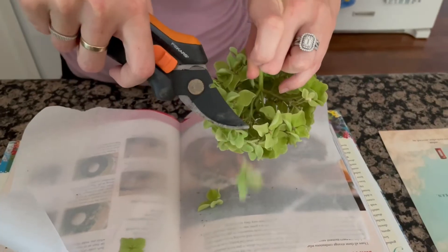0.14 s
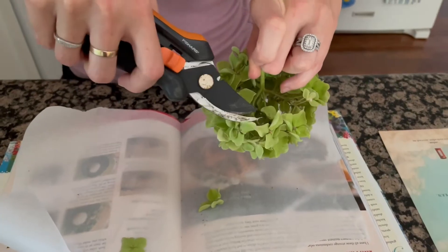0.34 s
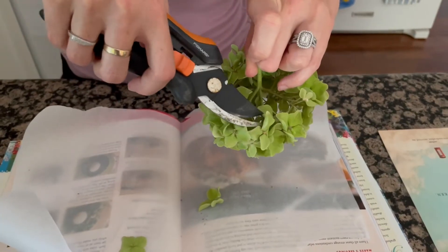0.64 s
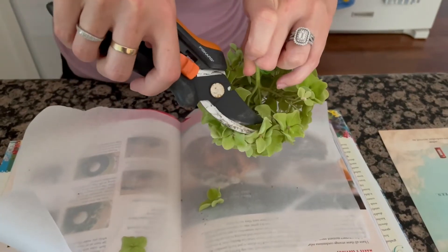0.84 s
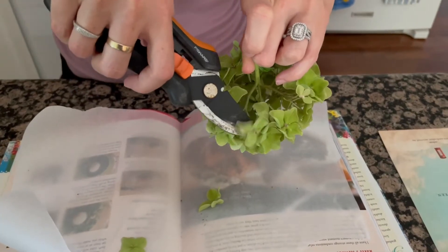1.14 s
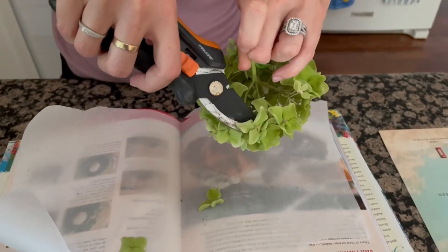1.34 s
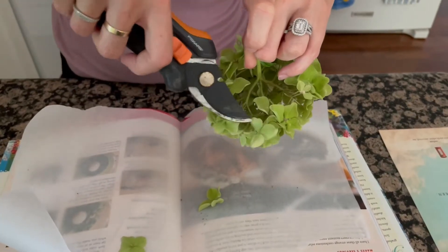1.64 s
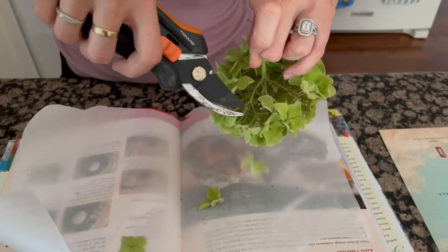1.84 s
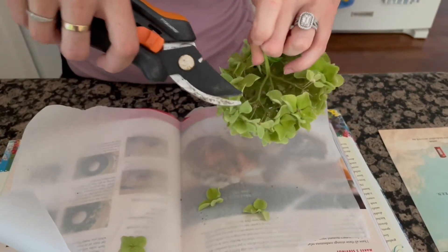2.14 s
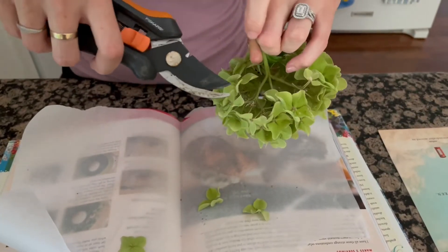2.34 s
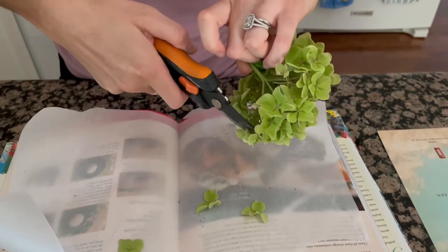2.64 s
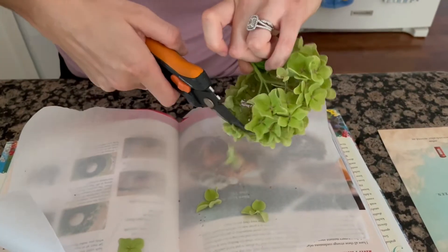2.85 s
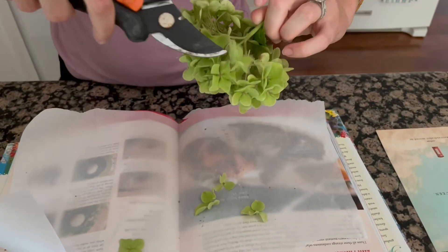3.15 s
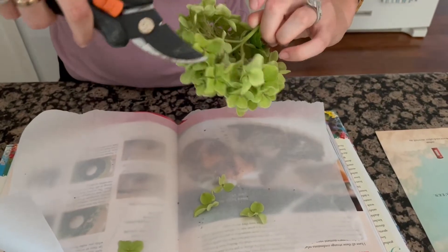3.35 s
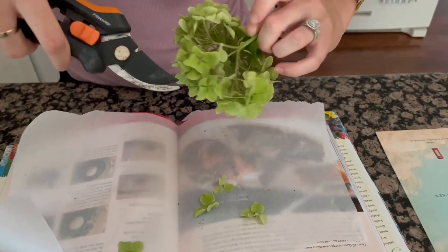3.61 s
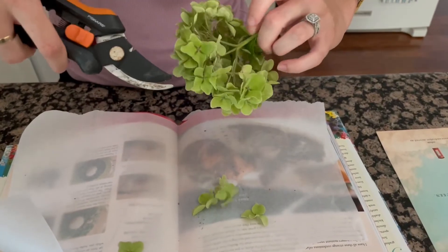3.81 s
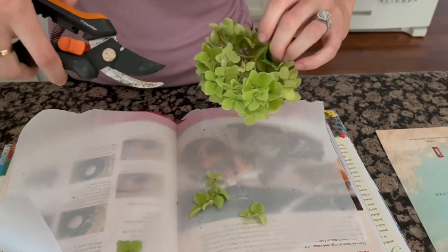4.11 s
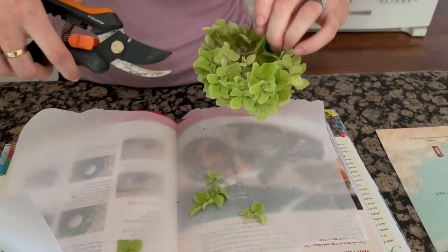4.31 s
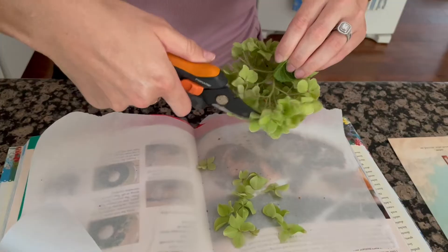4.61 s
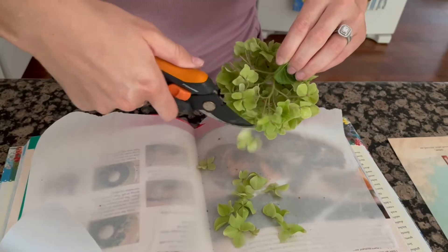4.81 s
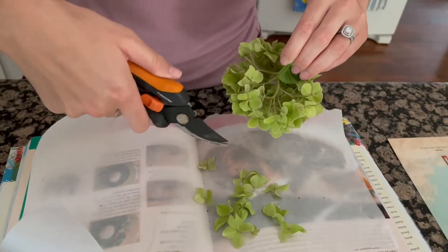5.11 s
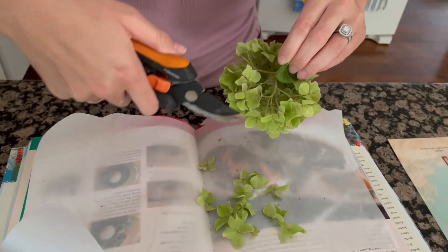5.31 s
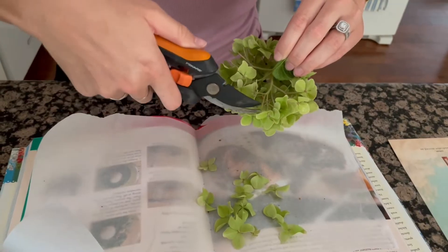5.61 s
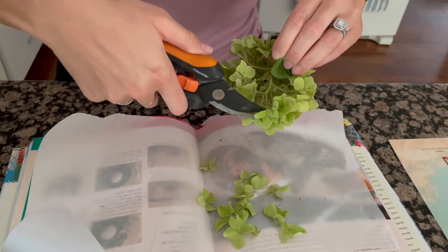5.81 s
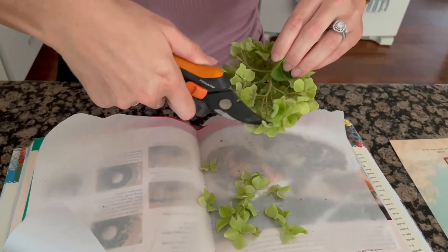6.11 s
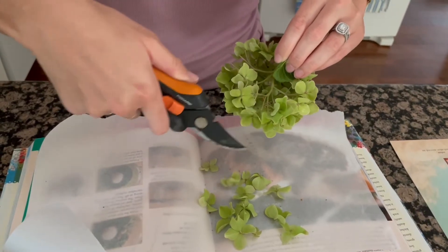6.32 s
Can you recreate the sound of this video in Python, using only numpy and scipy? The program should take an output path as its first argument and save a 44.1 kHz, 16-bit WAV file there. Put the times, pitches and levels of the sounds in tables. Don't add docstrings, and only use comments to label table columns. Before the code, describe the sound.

Over a quiet ventilation hum, blades snap sharply through a stem, then snip again in uneven groups with petals rustling and stems creaking. The middle grows busier with clicks, folds and a brief dull cloth drag. An abrupt scene change brings a much stronger low airy rumble, with more crisp cuts on top. Near stereo phone microphone, small kitchen with short reverberation.

```python
import sys
import numpy as np
from scipy import signal
from scipy.fft import rfft, irfft
from scipy.io import wavfile
from scipy.ndimage import uniform_filter1d

SR = 44100
rng = np.random.default_rng(int(sys.argv[2]) if len(sys.argv) > 2 else 0)


def int16_out(signal):
    q = np.round(np.clip(np.atleast_2d(signal).T, -1, 1) * 32767)
    wavfile.write(sys.argv[1], SR, q.astype(np.int16))


def boost_factor(decibels):
    exponent = np.asarray(decibels, float) / 20
    return 10 ** exponent


N = 284886
HZ = np.fft.rfftfreq(N, 1 / SR)
SIDES = np.array([[1], [-1]])
BROAD, FOCUS = 5, 0.8


def on_log(table, hz):
    f, v = np.transpose(table)
    return np.interp(np.log(hz + 1), np.log(f + 1), v)


def unit(x):
    return x / np.sqrt(np.mean(x ** 2))


def colour(x, db):
    return irfft(rfft(x) * boost_factor(db), x.shape[-1])


def bump(hz, centre_hz, width_hz):
    return 1 / (1 + (2 * (hz - centre_hz) / width_hz) ** 2)


def walk(rate):
    k = int(SR / rate)
    levels = np.repeat(rng.standard_normal(N // k + 1), k)
    return 1.3 * uniform_filter1d(uniform_filter1d(levels, k), k)[:N]


def diffuse(length):
    # pitch_hz, coherence (0-1)
    alike = [(60, .96), (200, .92), (400, .75), (800, .4), (1500, .1), (3000, .3), (4200, .7), (5200, .25),
             (6300, .75), (7000, .85), (7700, .9993), (17000, .9993)]
    c = np.clip(on_log(alike, np.fft.rfftfreq(length, 1 / SR)), 0, 1)
    mid, side = rfft(rng.standard_normal((2, length)))
    return irfft(np.sqrt((1 + c) / 2) * mid + np.sqrt((1 - c) / 2) * side * SIDES, length)


def swells(s, hold_s, db, t60, rise_db_s):
    t = np.arange(0, N + 32, 32)[:, None] / SR
    rise_lost_db = rise_db_s * np.maximum(s - t, 0)
    fade_lost_db = 60 / np.maximum(t60, 0.02) * np.maximum(t - s - hold_s, 0)
    gains = np.atleast_2d(boost_factor(db - np.minimum(rise_lost_db + fade_lost_db, 200)))
    gain = np.sqrt(np.sum(gains ** 2, axis=1))
    return np.interp(np.arange(N) / SR, t[:, 0], gain)


def crackle(rate, spread_db, hiss):
    sizes_db = spread_db * np.minimum(rng.exponential(size=N), 4)
    slips = (rng.random(N) < rate / SR) * boost_factor(sizes_db)
    smear = np.exp(-np.arange(300) / (0.0012 * SR))
    rub = hiss + unit(signal.fftconvolve(slips, smear)[:N])
    return rub * boost_factor(1.5 * walk(45)) * diffuse(N)


def patchy(x, centres_hz, patch_db):
    spectrum = rfft(x)
    total = 0
    for f in centres_hz:
        band = irfft(spectrum * bump(HZ, f, 0.2 * f) ** 2, N)
        total = total + boost_factor(patch_db * walk(22) + 2.2 * walk(150)) * band
    return unit(total)


def drone(spectrum, duct, level, deep_db):
    # middle_s, depth_db, half_length_s
    sags = [(.12, 13, 0.14), (.45, 2.5, 0.39), (0.777, 6, 0.45), (1.29, 21.5, 0.15), (1.8, 15, 0.15),
            (2.218, 10.5, 0.19), (2.577, 12, 0.32), (3.024, 9.5, 0.13), (3.315, 5, 0.11), (3.798, 25, 0.15),
            (4.156, 16, 0.26), (4.417, 16, 0.08), (5.472, 5.5, 0.29), (5.75, -0.5, 0.093),
            (6.004, 8, 0.091), (6.38, 17, 0.1)]
    db = on_log(spectrum, HZ) + sum(g * bump(HZ, f, w) for f, w, g in duct)
    air = unit(colour(diffuse(N), db))
    deep = irfft(rfft(air) * bump(HZ, 57.7, 56) ** 2, N)
    power = uniform_filter1d(deep.mean(axis=0) ** 2, SR // 8)
    envelope = np.sqrt(uniform_filter1d(power, SR // 8)) + 1e-9
    t = np.arange(N) / SR
    sag_db = sum(d * np.maximum(1 - np.abs(t - s) / half, 0) for s, d, half in sags)
    rush = (air - deep) * boost_factor(0.7 * walk(5))
    return level * (rush + deep / envelope * boost_factor(deep_db - sag_db))


def ventilation(after):
    # pitch_hz, density_db (per Hz)
    soft_spectrum = [(12, -58), (20, -43.5), (40, -9), (65, 5.5), (86, -6.5), (174, -9.5), (323, -19),
                     (440, -20), (994, -26.5), (1300, -31), (3230, -39), (4660, -46.5), (8650, -45),
                     (12500, -56.5), (16500, -49.5)]
    loud_spectrum = [(12, -61), (20, -57), (49, 0), (91, -7.5), (156, -2.5), (265, -10.5), (314, -14.5),
                     (440, -17.5), (888, -24), (1140, -24.5), (2500, -36.5), (3300, -45), (6500, -56),
                     (12500, -62.5), (16500, -68.5)]
    # pitch_hz, width_hz, level_db (over the drone)
    soft_duct = [(59, 4, 13), (118, 8, 7), (165, 12, 8), (195, 8, 5), (362, 30, 6), (478, 10, 6),
                 (1050, 30, 8), (1850, 60, 4)]
    loud_duct = [(59, 4, 12), (130, 10, 4), (149, 8, 7), (175, 8, 5), (220, 5, 7), (259, 4, 8),
                 (480, 10, 4), (1050, 150, 2)]
    soft = drone(soft_spectrum, soft_duct, boost_factor(-47.5) * (1 - after), deep_db=-1.15)
    loud = drone(loud_spectrum, loud_duct, boost_factor(-37.5) * after, deep_db=-3.5)
    return soft + loud


def whine(after):
    # pitch_hz, soft_db, loud_db
    tones = [(438, -74, -65), (259, -82, -60), (1050, -84, -79)]
    t = np.arange(N) / SR
    total = 0
    for hz, soft_db, loud_db in tones:
        level_db = soft_db + (loud_db - soft_db) * after + 2.53 * walk(5.4)
        total = total + boost_factor(level_db) * np.sin(2 * np.pi * hz * t + 0.99 * walk(3))
    return total


def sleeve():
    cloth = unit(irfft(rfft(diffuse(N)) * bump(HZ, 1160, 2100) ** 2, N))
    return cloth * swells(3.438, 0, -50, 0.57, rise_db_s=371)


def petals():
    # pitch_hz, density_db (per Hz)
    petal = [(4500, -13.5), (6500, -12), (8500, -9), (11500, -10.5), (13500, -11), (15000, -4), (15900, -8),
             (16600, -30)]
    # time_s, level_db
    sheen = [(0, 2), (.5, 0.5), (.9, 3), (1.35, 4), (1.7, 0), (2.3, -1.5), (2.7, 1.5), (3.2, 1), (3.7, 0.5),
             (4.3, -3), (4.6, 0.5), (5, -6), (5.5, -4), (5.9, -3), (6.46, -2)]
    # start_s, hold_s, level_db, fade_t60_s
    slides = [(0, 0.18, -61.5, .3), (.196, .003, -48, 0.062), (0.233, 0.046, -53.5, 0.7),
              (0.464, .003, -56.5, 0.58), (0.597, 0.19, -67.5, 0.69), (0.857, 0.028, -61, 0.3),
              (.975, 0.018, -68.5, 0.37), (1.24, 0.11, -69, 0.45), (0.355, 0.026, -60, .2),
              (1.101, 0.065, -64.5, 0.84), (1.425, 0.03, -51.5, 0.47), (1.637, 0.053, -53.5, 0.31),
              (1.694, 0.1, -60.5, 0.45), (4.482, .05, -64, .3), (1.91, 0.0027, -51, 0.22),
              (1.982, 0.013, -50, 0.21), (5.624, 0.19, -66.5, 0.6), (2.56, 0.016, -52, 0.35),
              (2.668, 0.0035, -44, 0.31), (2.892, 0.0076, -51.5, 0.81), (3.019, 0.085, -49, 0.19),
              (3.2, 0.0034, -56, 0.46), (3.348, 0.013, -57.5, 0.78), (3.563, .01, -60, 0.21),
              (3.754, 0.16, -53, 0.34), (3.9, .01, -52, 1), (4.013, 0.067, -59, 0.2),
              (4.538, 0.018, -51.5, 0.74), (4.602, 0.14, -54, 0.19), (4.89, .003, -51.5, 0.58),
              (4.995, 0.2, -63, 0.16), (5.902, 0.08, -64, 0.33), (6.018, 0.16, -55, 0.17),
              (6.29, .01, -54, 0.69)]
    # start_s, papery_db, dull_db, fade_t60_s
    folds = [(.196, -55, -49, .2), (.225, -42, -45, 0.43), (.472, -57, -49, 0.2), (0.599, -54, -44.5, 0.24),
             (1.01, -68, -82, 0.53), (1.427, -57, -50, 0.29), (1.641, -66, -46, 0.28),
             (1.765, -46, -49, 0.21), (1.906, -61, -47, 0.14), (2.291, -62, -63, .6),
             (2.383, -51, -49.5, 0.2), (2.625, -53, -53, 0.83), (2.701, -34.5, -65, 0.079),
             (2.892, -40, -44.5, 0.29), (3.02, -57, -69, 0.44), (3.085, -44.5, -45, 0.25),
             (3.196, -65, -59, 0.19), (3.562, -51, -52, 0.33), (3.734, -49.5, -51, 1.4),
             (3.911, -44, -45, 0.49), (4.033, -59, -42.5, 0.3), (4.54, -48.5, -51, 0.69),
             (4.606, -51, -44.5, 0.56), (4.873, -45, -49.5, 1.4), (5, -36, -42, 0.25),
             (5.145, -42.5, -39.5, 0.22), (5.988, -53, -47, 0.76), (6.036, -36.5, -45, 0.14),
             (6.245, -48, -48, 0.38), (6.335, -43.5, -46, 0.76)]
    slips = crackle(400, 2.9, 2.0)
    bright_hz = [4400, 5300, 6400, 7560, 9300, 11000, 13000, 15000]
    bright = patchy(colour(slips, on_log(petal, HZ)), bright_hz, patch_db=3.5)
    top = irfft(rfft(bright) * bump(HZ, 13000, 5000), N)
    bright = bright + (boost_factor(np.interp(np.arange(N) / SR, *np.transpose(sheen))) - 1) * top
    papery = patchy(slips, [3210, 3700, 4250, 4700, 5900, 7340], patch_db=4.5)
    dull = patchy(crackle(350, 2.7, 2.7), [1480, 1775, 2300, 2970], patch_db=2.0)
    s, papery_db, dull_db, t60 = np.transpose(folds)
    sliding = swells(*np.transpose(slides), rise_db_s=603) * boost_factor(-1.5) * bright
    folding = swells(s, 0, papery_db - 14.0, t60, rise_db_s=531) * papery
    bending = swells(s, 0, dull_db - 10.5, t60, rise_db_s=531) * dull
    return sliding + folding + bending


def knocks():
    # start_s, level_db, pitch_hz, width_hz, t60_s
    rings = [(.188, -48.5, 960, 500, 0.2), (.197, -45, 3230, 250, .05), (.251, -50, 2460, 500, 0.15),
             (.57, -51.5, 1080, 700, 0.62), (0.592, -55, 2050, 300, 0.29), (.86, -55, 1570, 297, .06),
             (1.03, -68, 4730, 150, 0.16), (1.375, -71, 4000, 200, 0.55), (1.406, -59, 4000, 250, 0.2),
             (1.46, -57, 4440, 700, .25), (1.53, -66, 4600, 400, .15), (1.895, -53, 1000, 220, 0.16),
             (1.979, -57, 5600, 300, .06), (2.022, -64, 4700, 250, 0.12), (2.372, -59, 5300, 199, .12),
             (2.378, -48.5, 2060, 90, 0.15), (2.372, -55.5, 1077, 200, 0.069), (2.378, -55, 1475, 150, .1),
             (2.378, -59, 2750, 40, 0.24), (2.455, -63, 2000, 150, 0.11), (2.368, -48.5, 2650, 200, 0.056),
             (2.37, -57, 3900, 110, 0.21), (2.695, -49.5, 766, 200, 0.13), (2.675, -55, 2720, 400, 0.19),
             (3.06, -51.5, 1190, 600, 0.094), (3.149, -60, 366, 140, 0.6), (3.188, -55.5, 2570, 1200, 0.24),
             (3.21, -59.5, 2420, 900, 0.2), (3.2, -60.5, 4400, 600, 0.13), (3.24, -64.5, 3550, 300, 0.17),
             (3.015, -58, 4400, 500, 0.32), (3.06, -58, 4400, 500, 0.32), (.205, -52.5, 3500, 4000, 0.26),
             (.26, -57, 4000, 4020, .3), (3.432, -50, 1030, 150, 0.29), (3.455, -48.5, 660, 150, .15),
             (3.6, -61, 367, 120, 0.22), (4.025, -50, 1060, 248, 0.13), (4.027, -49, 5370, 500, 0.068),
             (4.03, -53, 3430, 300, .12), (4.591, -48, 2700, 300, 0.054), (5.629, -59.5, 2900, 1200, 0.44)]
    size = 8192
    t, hz = np.arange(size) / SR, np.fft.rfftfreq(size, 1 / SR)
    out = np.zeros((2, N + size))
    for s, db, ring_hz, width_hz, t60 in rings:
        ring = unit(irfft(rfft(diffuse(size)) * bump(hz, ring_hz, width_hz), size))
        i = int(s * SR)
        out[:, i:i + size] += ring * np.minimum(t / 0.0019, 1) * boost_factor(db - 60 * t / t60)
    return out[:, :N]


def strike(events, pan_db, spread):
    # pitch_hz, density_db (per Hz)
    crack_spectrum = [(500, -15.5), (1200, -24.5), (2500, -16), (4000, -17.5), (6300, -11), (8500, -8),
                      (12000, -13), (14800, -9), (15800, -15), (16500, -34)]
    size = 2048
    t, hz = np.arange(size) / SR, np.fft.rfftfreq(size, 1 / SR)
    out = np.zeros((2, N + size))
    for s, db, ring_hz, ring_db, t60 in events:
        noise = rng.standard_normal((3, size))
        fall = np.minimum(t / (0.064 * t60), 1) * boost_factor(-60 * t / max(t60, 0.002))
        crack_db = on_log(crack_spectrum, hz) + 10 * np.log10(bump(hz, ring_hz, spread * ring_hz))
        crack = unit(colour(noise[0], crack_db)) * fall
        ring = unit(irfft(rfft(noise[1]) * bump(hz, ring_hz, 0.228 * ring_hz), size)) * fall ** 0.73
        apart = boost_factor(-15) * unit(colour(noise[2], crack_db)) * fall * SIDES
        i = int(s * SR)
        out[:, i:i + size] += (crack + apart + boost_factor(ring_db) * ring) * boost_factor(db - 3.0 + pan_db / 2 * SIDES)
    return out[:, :N]


def stem_creaks():
    # start_s, peak_db, pitch_hz
    creaks = [(0.5125, -45.5, 1800), (.5574, -53, 2700), (1.694, -42, 3200), (2.0326, -51, 2000),
              (3.189, -49, 2330), (3.8377, -42, 1980), (4.0503, -50, 3300), (4.5097, -51, 1890),
              (4.724, -50, 1960), (4.8592, -40, 2080), (4.987, -38, 2460), (5.01, -37, 3430),
              (5.63, -48, 1960), (6.137, -53, 2000), (6.334, -39, 2480), (6.353, -42, 2850),
              (6.423, -42, 1910)]
    return strike([(s, db, hz, -7.5, 0.029) for s, db, hz in creaks], pan_db=2, spread=BROAD)


def petal_flicks():
    # start_s, peak_db, pitch_hz
    flicks = [(.337, -60, 6000), (0.37, -51, 4570), (.478, -61, 9500), (.5575, -42, 11500),
              (0.512, -46, 11500), (.805, -60.5, 11700), (1.13, -51, 7160), (1.436, -52, 12000),
              (1.462, -48, 12600), (1.904, -37, 12000), (1.939, -54, 11500), (1.954, -50, 12300),
              (1.98, -47, 9700), (1.984, -48, 7200), (1.993, -47, 11800), (2.003, -53, 11000),
              (2.5948, -50, 5380), (2.662, -34, 10800), (.862, -46, 11500), (2.8675, -48, 12400),
              (2.756, -50, 12500), (3.3534, -47, 12600), (3.19, -53, 11000), (4.9128, -46, 4860),
              (5.047, -46, 3900), (5.0714, -52, 11500), (6.136, -36, 11600), (4.018, -41, 11500),
              (2.931, -53, 6000), (2.941, -51, 6200), (3.003, -57, 5500), (3.033, -45, 11000),
              (3.044, -52, 10500), (3.7872, -50, 6210), (3.8236, -45, 4400), (3.9927, -46, 6100),
              (4, -44, 10000), (4.087, -52, 11500), (4.1394, -57, 3080), (4.745, -55, 11000),
              (5.106, -37, 9900), (6.031, -46, 11500), (6.306, -51, 11000)]
    return strike([(s, db - 2.5, hz, 0, 0.012) for s, db, hz in flicks], pan_db=2, spread=FOCUS)


def blade_ticks():
    # start_s, peak_db, pitch_hz
    tick_events = [(0.1399, -49.5, 6670), (0.1486, -44.5, 6600), (.408, -45, 6100), (0.4315, -48, 6380),
                   (.445, -60, 6000), (0.6732, -49.5, 4250), (.7457, -52, 13000), (0.8577, -44, 4700),
                   (1.4262, -54, 4300), (1.988, -35, 11500), (2.284, -51.5, 4960), (2.545, -52, 6600),
                   (2.5593, -44.5, 4120), (2.644, -45, 6510), (2.668, -36, 11000), (2.891, -44, 4970),
                   (2.96, -45, 6100), (3.0577, -36, 5950), (3.092, -44, 6750), (3.116, -41, 6400),
                   (3.337, -52.5, 4040), (3.7845, -45, 6200), (3.799, -42, 4340), (3.8893, -40.5, 4750),
                   (3.902, -40, 6500), (4.06, -49, 6500), (4.526, -40, 4500), (4.558, -39.5, 4510),
                   (4.939, -40.5, 6300), (6.3784, -39, 4470)]
    return strike([(s, db, hz, -11.5, 0.02) for s, db, hz in tick_events], pan_db=5, spread=FOCUS)


def blade_snips():
    # start_s, peak_db, pitch_hz, ring_db (over the crack), t60_s
    snap = [
        (.172, -48.5, 6400, -1, 0.019),
        (0.1866, -23, 6400, -4, 0.023),
        (0.186, -30, 12600, 0, 0.012),
        (0.1935, -11.5, 12400, 1.5, 0.0047),
        (0.195, -28.5, 5500, -3, .025),
        (0.2004, -29.5, 3340, -8, 0.017),
    ]
    # start_s, peak_db, pitch_hz, ring_db (over the crack), t60_s
    snips = [(0.4635, -30.5, 2380, -12, 0.018), (0.59, -34, 2000, -18, 0.029),
             (1.4509, -27, 4380, -11, 0.0163), (1.6337, -37.5, 2300, -10.5, 0.033),
             (1.729, -37, 2660, -10.5, 0.053), (1.7654, -41, 2510, -4.5, 0.031),
             (1.895, -30, 3540, -15, 0.026), (2.371, -37, 2070, -8, 0.031), (2.6968, -27, 4850, -14, 0.015),
             (2.8777, -27.5, 6260, -16, 0.027), (3.01, -36, 4500, -25, 0.034),
             (3.551, -34, 2520, -10.5, 0.039), (3.721, -30.5, 3400, -11, 0.028),
             (3.9125, -29, 2900, -8, 0.023), (4.0237, -28.5, 3100, -11, 0.021),
             (4.0784, -42, 2310, -5, 0.033), (4.593, -30, 2870, -5.5, 0.0145),
             (4.8676, -29, 6340, -22, 0.024), (4.967, -35.5, 4400, -2, 0.017),
             (5.1013, -31.5, 7000, -5, 0.024), (5.1453, -30.5, 5660, -5, 0.0093),
             (5.9837, -30.5, 4250, -5.5, 0.018), (6.038, -32.5, 4300, -6.5, 0.0268),
             (6.236, -27, 5900, -11, 0.035)]
    return strike([*snap, *snips], pan_db=1.2, spread=BROAD)


def kitchen(x):
    room_t60_s, dull_hz, room_db = 0.23, 4500, -11
    size = SR // 2
    t = np.arange(size) / SR
    tail = diffuse(size) * boost_factor(-60 * t / room_t60_s) * np.minimum(t / 0.0073, 1)
    absorption = np.sqrt(bump(np.fft.rfftfreq(size, 1 / SR), 0, 2 * dull_hz))
    tail = irfft(rfft(tail) * absorption, size)
    tail = tail / np.sqrt(np.sum(tail ** 2) / 2)
    return signal.fftconvolve(x.mean(axis=0)[None], tail)[:, :N] * boost_factor(room_db)


def scene():
    after = swells(4.474, N / SR, 0, 1, rise_db_s=903)
    air = ventilation(after) + whine(after) + whine(after)
    near = stem_creaks() + petal_flicks() + blade_ticks() + blade_snips()
    return near + kitchen(near) + petals() + sleeve() + knocks() + air


def top_cut(x):
    return signal.sosfilt(signal.butter(12, 16650, fs=SR, output="sos"), x)


def record(dry):
    # pitch_hz, lead (half turns)
    ports = [(0, 0), (5000, 0), (6200, -.17), (6900, -.4), (7800, -1), (8750, -1.03), (9650, -1.5),
             (10900, -2), (11800, -2), (13100, -2.44), (14400, -2.95), (15300, -3), (15700, -3.14),
             (22050, -3.14)]
    # pitch_hz, level_db
    tilt = [(30, -2.6), (200, -1.7), (1000, -.8), (3000, .8), (6500, 0), (7500, -.6), (16000, -.5)]
    f, lead = np.transpose(ports)
    half = boost_factor(on_log(tilt, HZ) / 2) * np.exp(0.5j * np.pi * np.interp(HZ, f, lead))
    mix = irfft(rfft(dry) * np.array([half, 1 / half]), N)
    return top_cut(mix)


dry = scene()
out = record(dry)
int16_out(out)
```